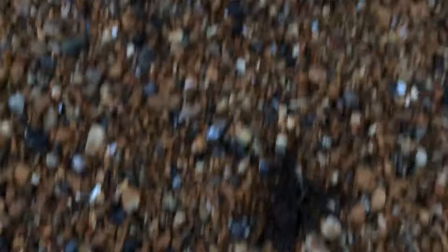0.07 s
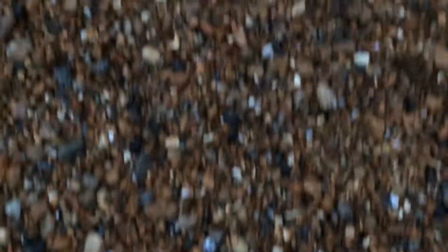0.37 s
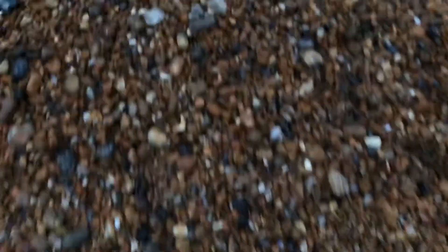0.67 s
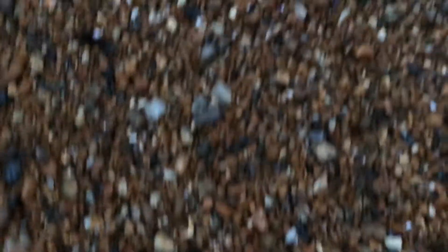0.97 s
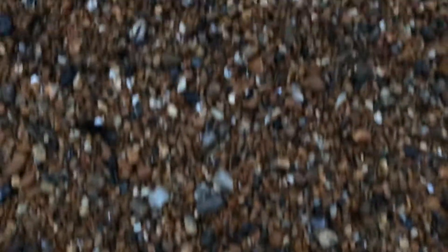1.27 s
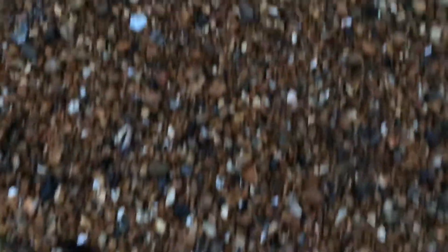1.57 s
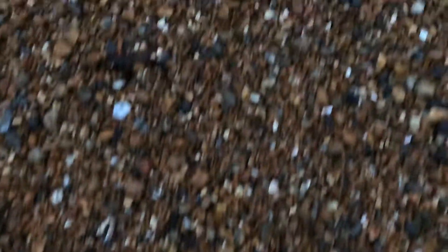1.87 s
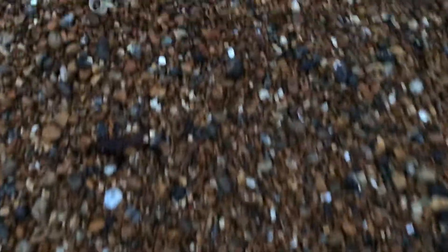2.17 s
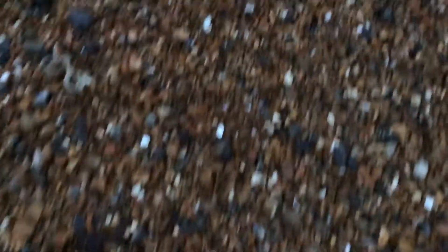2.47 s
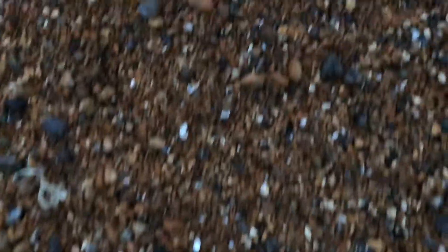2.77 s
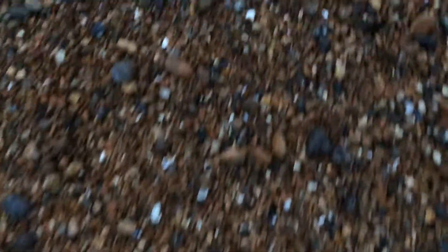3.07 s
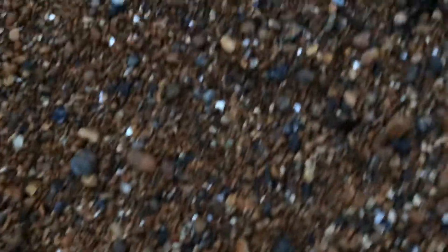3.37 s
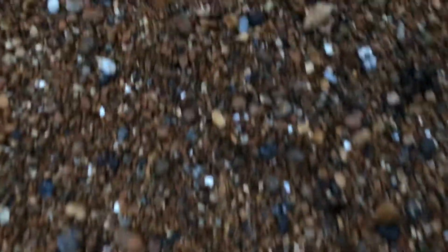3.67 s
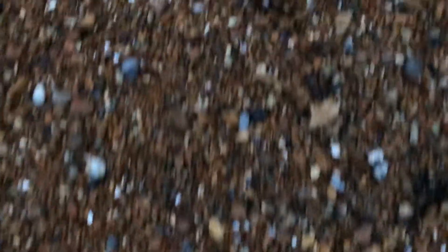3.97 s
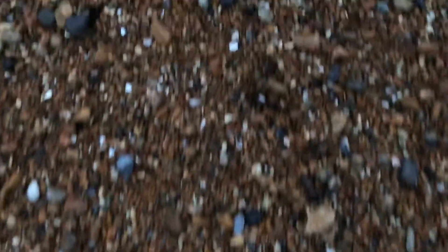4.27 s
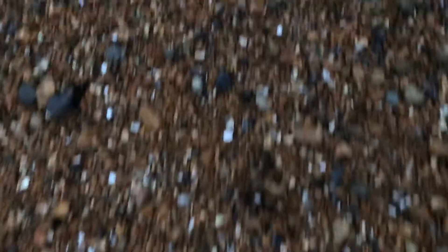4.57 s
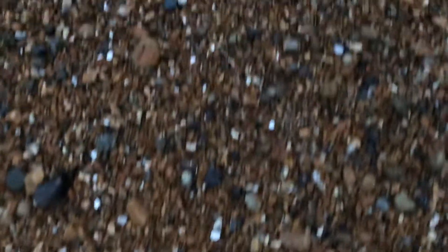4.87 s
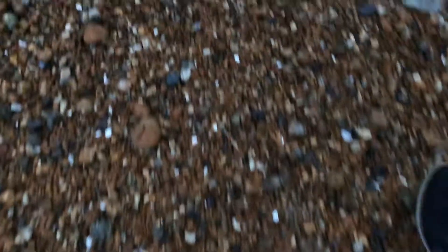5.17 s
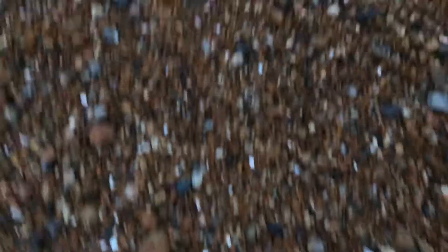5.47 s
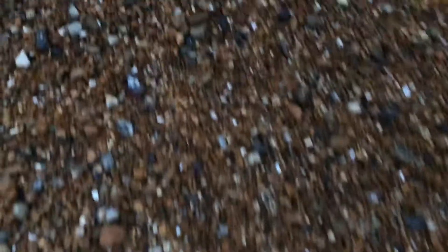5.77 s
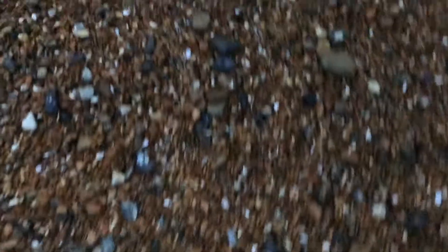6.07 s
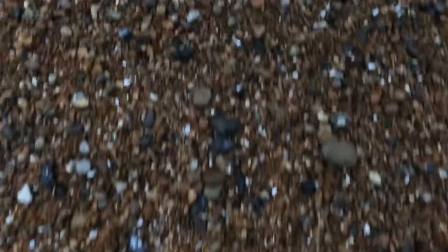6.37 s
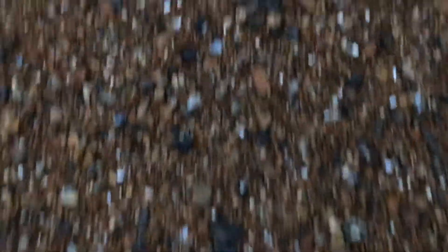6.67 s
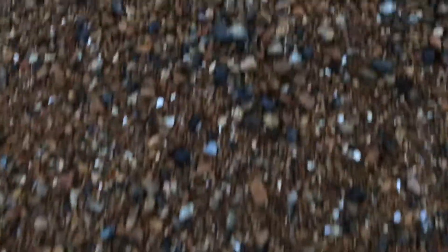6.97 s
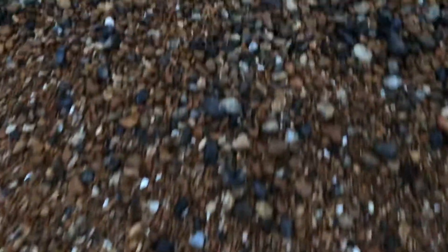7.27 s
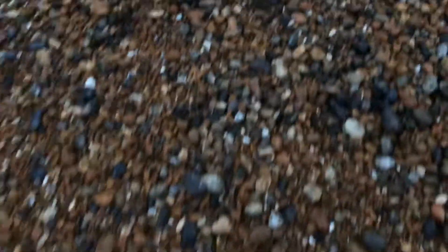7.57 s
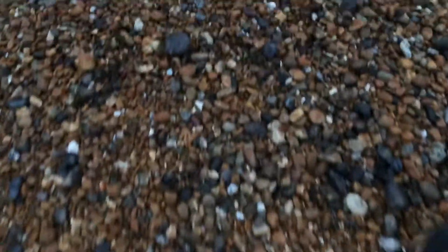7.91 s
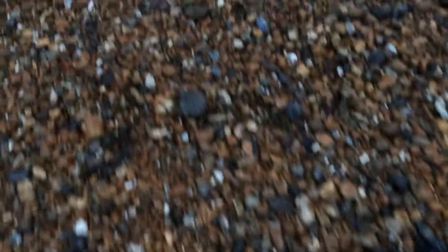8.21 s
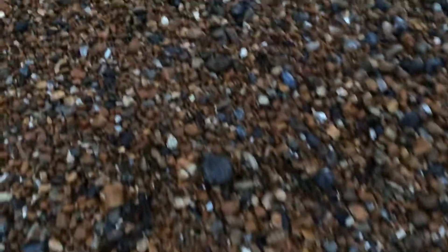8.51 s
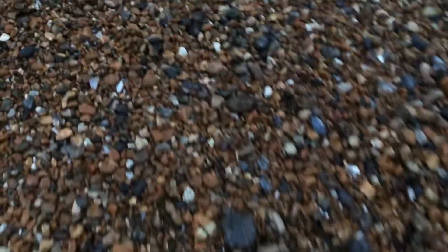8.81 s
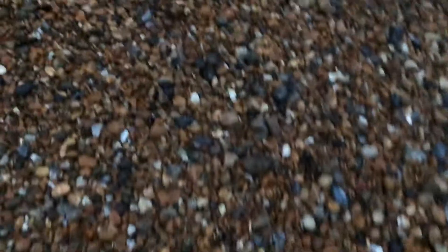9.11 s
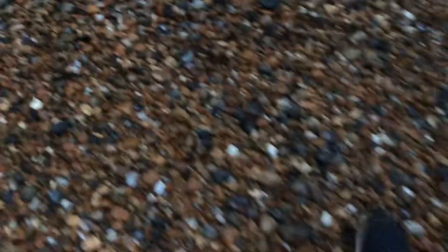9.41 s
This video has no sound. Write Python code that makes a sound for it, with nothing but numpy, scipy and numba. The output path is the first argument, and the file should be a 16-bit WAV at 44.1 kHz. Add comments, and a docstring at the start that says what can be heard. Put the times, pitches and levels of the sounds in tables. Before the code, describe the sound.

Someone walks at a steady pace across a pebble beach, each step a close, bright crunch followed by grinding and small stones pattering back. A long blow of wind rumbles and thumps on the microphone over the first steps, then breaks into separate gusts. Near the end, kicked stones clack together in a cluster before one last heavy step. Faint surf washes in the distance throughout.

```python
"""A steady walk over a shingle beach, the microphone held above the feet, faint surf behind.
The first steps land in a long blow of wind, whose eddies hit the microphone as pressure pulses.
Each heel drives a burst of pebble collisions, the sole grinds on, the toe pushes off, stones settle.
From about 3.5 s the wind breaks into separate gusts; around 8 s kicked stones knock in a cluster.
One last heavy step ends the walk. Throughout, a limiter holds the peaks."""
import sys
import numpy as np
from scipy import signal
from scipy.fft import rfft, irfft
from scipy.io import wavfile
from scipy.ndimage import uniform_filter1d, minimum_filter1d
from numba import njit

SR = 44100
rng = np.random.default_rng(int(sys.argv[2]) if len(sys.argv) > 2 else 0)


def dump(signal):
    """Clip the signal to [-1, 1] and save it as 16-bit WAV at the path in sys.argv[1]."""
    limited = np.clip(np.atleast_2d(signal).T, -1, 1)
    pcm = np.round(limited * 32767).astype(np.int16)
    wavfile.write(sys.argv[1], SR, pcm)


N = 425565
TIME = np.arange(N) / SR
FREQ = np.maximum(np.arange(N // 2 + 1) * SR / N, 1)

# footsteps: t/s, heel level/dB, heel sink/s, heel hold/s, heel treble/dB,
# sole level/dB, sole roll/s, toe level/dB, sole treble/dB
FOOTSTEPS = [(0.0, -14.5, 0.0067, 0.026, -7.0, -30.5, 0.21, -32.5, -13),
             (0.656, -13.5, 0.013, 0.011, -6, -29.5, 0.29, -38.5, -14),
             (1.392, -12.0, 0.014, 0.0088, -5.5, -27.5, 0.26, -33.5, -11.5),
             (2.177, -19.0, 0.019, 0.0038, -6.5, -41.0, 0.27, -27.5, -12),
             (2.939, -17.0, 0.028, 0.018, -5, -31.5, 0.23, -30.5, -10.5),
             (3.681, -21.0, 0.032, 0.013, -5.5, -39.0, 0.28, -31.5, -14),
             (4.425, -16.5, 0.0098, 0.027, -3.5, -26.5, 0.21, -25.5, -9.5),
             (5.157, -19.0, 0.015, 0.063, -6, -26.5, 0.23, -25.0, -10),
             (5.843, -20.0, 0.027, 0.036, -6, -25.5, 0.19, -35.0, -9),
             (6.526, -19.0, 0.011, 0.045, -5, -38.0, 0.23, -25.5, -11.5),
             (6.88, -22.0, 0.011, 0.032, -5, -44.5, 0.162, -41.5, -23),
             (7.224, -22.0, 0.02, 0.058, -5.5, -30.0, 0.24, -29.0, -9.5),
             (7.954, -27.5, 0.016, 0.054, -7.5, -33.0, 0.27, -28.0, -12),
             (8.358, -27, 0.036, 0.029, -4, -35.0, 0.161, -45, -7),
             (8.722, -17, 0.016, 0.039, -5.5, -30.5, 0.23, -42.5, -12),
             (9.519, -14, 0.04, 0.018, -8.5, -19.5, 0.16, -30, -10.5)]
# single stones knocking together: t/s, level/dB, relative body level/dB
STONE_KNOCKS = [(0.295, -17.5, -23), (1.039, -21, -12), (1.154, -29, 3), (1.8028, -22, -23),
                (2.603, -25, -16), (5.0778, -34, -14), (5.669, -20, -27), (5.6804, -20, -26),
                (5.961, -10, -20), (7.2813, -11, -20), (7.5612, -25, -15), (7.677, -18, -20),
                (7.9658, -16, -19), (8.0164, -14, -20), (8.0603, -16, -20), (8.299, -21, -18),
                (8.3674, -18.5, -16), (8.3913, -13.5, -5.5), (8.4013, -14, -20), (8.4144, -10, -22),
                (8.458, -14, -24), (8.8464, -26, -12), (9.0244, -19, -20), (9.1431, -30, 3)]
# tone of the pebbles: f/Hz, level/dB
PEBBLE_EQ = [(500, -16), (1200, -18), (2200, -13), (3200, -8), (4500, -4), (6200, -0.5), (8300, 0.5),
             (10500, -2), (13000, -6.5), (16000, -9)]
# single strong eddies: t/s, level/dB
STRONG_EDDIES = [(0.258, -6), (0.529, -10.5), (0.717, -10), (0.747, -7.5), (0.784, -6), (0.834, -6.5),
                 (0.895, -4), (0.967, -4), (1.009, -8.5), (1.187, -4), (1.308, -11.5), (1.552, -11),
                 (1.704, -4), (2.44, 0), (2.464, 0), (2.65, -5), (3.036, -10), (3.361, -11), (3.467, -9.5),
                 (3.6, -13.5), (4.028, -16), (4.053, -8.5), (4.153, -17), (4.37, -11), (4.497, -4.5),
                 (5.715, -17.5), (5.751, -15.5), (7.684, -11), (8.441, -8.5), (9.135, -17.5), (9.46, -20.5)]


def undb(db):
    """Decibels to gain."""
    return 10 ** (np.asarray(db) / 20)


def unit(x):
    """Scale to rms 1."""
    return x / np.sqrt(np.mean(x ** 2))


def curves(table):
    """Automation: join timed rows by straight lines, one curve for each column."""
    times, *columns = np.transpose(table)
    return [np.interp(TIME, times, column) for column in columns]


def colour(x, points):
    """EQ a sound through points of f/Hz, level/dB."""
    hz, db = np.transpose(points)
    return irfft(rfft(x) * undb(np.interp(np.log(FREQ), np.log(hz), db)), N)


def band(x, lo_hz, hi_hz, order=8):
    """Band-pass with smooth skirts and no delay."""
    return irfft(rfft(x) / np.sqrt((1 + (lo_hz / FREQ) ** order) * (1 + (FREQ / hi_hz) ** order)), N)


def wobble(rate_hz):
    """Smooth random modulation, rms 1."""
    knots = rng.standard_normal(N // 10)
    joined = np.interp(TIME * rate_hz, np.arange(len(knots)), knots)
    return unit(uniform_filter1d(joined, int(SR / rate_hz / 2) + 1))


def even(x, span_s):
    """Ride the rms to about 1 over a span, keeping the faster detail."""
    size = int(span_s * SR)
    return x / np.sqrt(np.abs(uniform_filter1d(uniform_filter1d(x ** 2, size), size)) + 1e-12)


def swell(start, rise_s, length_s, fall_db_per_s):
    """Envelope that rises, holds until its length is over, then dies away."""
    age = TIME - start
    return np.clip(age / rise_s, 0, 1) * undb(-fall_db_per_s * np.clip(age - length_s, 0, 1))


def lull(times, depth_db, width_s):
    """Gain that dips smoothly around given moments."""
    marks = np.zeros(N)
    marks[(np.asarray(times) * SR).astype(int)] = 1
    dips = signal.fftconvolve(marks, np.hanning(int(width_s * SR)), "same")
    return undb(-depth_db * np.clip(dips, 0, 1))


def random_times(per_second):
    """Independent triggers at a steady or changing average rate."""
    return TIME[rng.random(N) < per_second / SR]


def accents(count, cap):
    """Random strengths: many weak, a few strong."""
    return np.minimum(rng.exponential(size=count), cap)


def surf():
    """A smooth, distant wash of waves on the shingle."""
    surf_fader = [(0, -40), (4.3, -42), (5.7, -37), (7.1, -38.5), (9.65, -35)]  # rise and fall of the surf: t/s, level/dB
    wash_eq = [(60, 1), (250, -13.5), (500, 2.5), (1200, 1), (2200, -5.5), (4000, -10), (8000, -21.5),
               (12000, -33), (16000, -37)]  # tone of the waves: f/Hz, level/dB
    level_db, = curves(surf_fader)
    wash = unit(colour(rng.standard_normal(N), wash_eq))
    flicker_db = .6 * wobble(9)
    return wash * undb(level_db + flicker_db)


def airflow(tear_db=-9, tear_at_db=-14.5, tear_growth=0.98, rumble_share=0.2):
    """Blow, gusts and breeze add in power: levels of rumble, flapping and tearing edge, in dB."""
    blow = [(0.0, -18, -22.5), (0.052, -12.5, -13.5), (0.206, -11, -12.5), (0.458, -19.5, -20),
            (0.567, -16.5, -16.5), (0.643, -21, -25.5), (0.744, -19.0, -15), (1.001, -14.5, -14),
            (1.208, -14, -13), (1.27, -24.0, -25.5), (1.337, -18, -13.5), (1.422, -29.5, -24.5),
            (1.567, -23.0, -19), (1.699, -12.5, -13), (2.036, -8, -14), (2.11, -23.5, -24.5),
            (2.227, -15, -11.5), (2.502, -12, -15), (2.715, -16.5, -15.5), (2.96, -23, -20),
            (3.173, -9.5, -17.0), (3.415, -19.0, -18.5)]  # the long opening blow: t/s, rumble/dB, flapping/dB
    breeze = [(3.498, -26.5, -30), (4.317, -23.5, -27.5), (4.845, -30, -31.5), (6.497, -31, -34.5),
              (8.587, -27.5, -33), (9.65, -34, -38.5)]  # a light, slowly dropping breeze: t/s, rumble/dB, flapping/dB
    gusts = [(3.45, 0.071, -14, -19), (3.583, 0.025, -14.5, -13.5), (3.67, 0.098, -19.5, -26),
             (4.006, 0.1, -12.5, -23), (4.115, 0.057, -19.0, -26), (4.356, 0.077, -13, -14),
             (4.465, 0.16, -13, -20), (4.659, 0.11, -26, -25), (4.929, 0.18, -23, -22.5),
             (5.137, 0.16, -33, -23), (5.441, 0.1, -25, -22.5), (5.613, 0.031, -23, -22.5),
             (5.719, 0.041, -28, -33), (5.91, 0.028, -26.0, -27), (6.12, 0.023, -17, -22),
             (6.173, 0.19, -27, -30), (6.542, 0.1, -30.0, -28.5), (6.768, 0.057, -38, -23.5),
             (6.987, 0.272, -26, -24.0), (7.317, 0.079, -23.5, -26.0), (7.449, 0.082, -16.5, -18),
             (7.577, 0.05, -17, -21.5), (7.664, 0.14, -21, -11.5), (7.794, 0.12, -18.5, -16.5),
             (7.968, 0.102, -24, -23.5), (8.102, 0.13, -33, -23), (8.29, 0.053, -28, -20.5),
             (8.406, 0.045, -27, -15.5), (8.535, 0.033, -23, -18), (8.908, 0.066, -29, -39.5),
             (9.041, 0.1, -28, -26.5)]  # separate gusts: t/s, length/s, rumble/dB, flapping/dB
    dying_db = 250 * np.clip(TIME - blow[-1][0], 0, 1)
    power = undb(np.array(curves(blow)) - dying_db) ** 2 + undb(curves(breeze)) ** 2
    for t, length_s, *levels_db in gusts:
        envelope = swell(t, rise_s=0.018, length_s=length_s, fall_db_per_s=300)
        power += (undb(levels_db)[:, None] * envelope) ** 2
    rumble_db, flap_db = 10 * np.log10(power)
    # the stream tears more, the harder it blows
    force_db = flap_db + rumble_share * np.maximum(rumble_db - flap_db, -3)
    edge_db = force_db + tear_db + tear_growth * (force_db - tear_at_db)
    return rumble_db, flap_db, edge_db


def sweep(x, cycles, knee_hz):
    """An eddy's sharp front comes first and its broad body later: a short falling flap."""
    return irfft(rfft(x) * np.exp(-2j * np.pi * cycles * np.log(FREQ + knee_hz)), N)


def wind(rumble_db, flap_db, edge_db, per_second=850, flutter_db=1.47, crackle_db=2.5):
    """Eddies hit the microphone as bunched pressure pulses; the strongest have the sharpest edges."""
    wind_eq = [(20, -37), (35, -24), (62, -2.5), (130, 2), (250, 1.5), (370, -0.5), (470, 0.5), (600, -3),
               (750, -6.5), (1100, -12.5), (1600, -22), (2300, -34), (3500, -46), (6000, -68)]  # tone of the eddies: f/Hz, level/dB
    boom_fader = [(0, -9.5), (1.4, -11.5), (2.0, -3.5), (2.7, -2.5), (5, -7.5), (6.2, -8), (8, -8),
                  (8.8, 0), (9.65, -0.5)]  # the largest, slowest eddies: t/s, level against the rumble/dB
    hits = (rng.random(N) < per_second / SR) * rng.choice([-1, 1], N)
    strength = accents(N, cap=3.5) + 0.98 * wobble(60)

    def eddies(lo_hz, hi_hz, spread_db, span_s):
        """The pulses in one range of eddy sizes, with some bunching of its own."""
        pulses = hits * undb(spread_db * (strength + .5 * wobble(45)))
        flaps = sweep(pulses, cycles=1.6, knee_hz=142)
        return even(band(colour(flaps, wind_eq), lo_hz, hi_hz), span_s)

    boom_db, = curves(boom_fader)
    boom = eddies(lo_hz=18, hi_hz=83, spread_db=3, span_s=0.099) * undb(rumble_db + boom_db - 1.1)
    rumble = eddies(lo_hz=117, hi_hz=228, spread_db=2.5, span_s=0.089) * undb(rumble_db - 1.73)
    flap = eddies(lo_hz=278, hi_hz=748, spread_db=3, span_s=0.046) * undb(flap_db - 0.56)
    edge = eddies(lo_hz=903, hi_hz=5014, spread_db=5, span_s=0.057) * undb(edge_db - 2.5)
    # the stream flutters in puffs, and goes slack just before a strong eddy arrives
    slack = lull(np.transpose(STRONG_EDDIES)[0] - .007, depth_db=7, width_s=0.021)
    puffs = undb(flutter_db * wobble(40)) * slack
    crackle = edge * undb(crackle_db * wobble(30))
    return boom + rumble + (flap + crackle) * puffs


def buffets(delay_s=0.00034, narrowest_s=0.00044, gain_db=7, body_db=-5, body_stretch=2.26):
    """A strong eddy swings the pressure once: a narrow popping core inside a broad, round body."""
    swings = np.zeros(N)
    for (t, level_db), turn in zip(STRONG_EDDIES, rng.random(len(STRONG_EDDIES))):
        width_s = narrowest_s * undb(-0.26 * level_db)  # weaker eddies are broader
        near = slice(int((t - .02) * SR), int((t + .02) * SR))
        passing = (TIME[near] - t - delay_s) / width_s
        core = (1 + 1j * passing) ** -3
        body = (1 + 1j * passing / body_stretch) ** -3
        swing = np.exp(2j * np.pi * turn) * (core + undb(body_db) * body)
        swings[near] += undb(level_db + gain_db) * swing.real
    return sweep(swings, cycles=2.1, knee_hz=94)


@njit
def ring(start, hz, t60, size):
    """Struck stones ring as a sum of damped sines."""
    out = np.zeros(N)
    for k in range(len(start)):
        pole = np.exp((2j * np.pi * hz[k] - np.log(1000) / t60[k]) / SR)
        z, first = size[k] + 0j, int(start[k] * SR)
        for i in range(max(first, 0), min(first + int(t60[k] * SR), N)):
            z *= pole
            out[i] += z.imag
    return out


def collisions(start, size, t60_s, scatter, modes=3):
    """Each collision rings a few random pitches very briefly; some ring longer than others."""
    shape = (len(start), modes)
    hz = rng.uniform(400, 17000, shape)
    t60 = t60_s * np.exp(scatter * np.minimum(rng.standard_normal(shape), 1))
    gain = np.reshape(size, (-1, 1)) * rng.choice([-1, 1], shape) * np.sqrt(t60_s / t60)
    return ring(np.repeat(start, modes), hz.ravel(), t60.ravel(), gain.ravel())


def strays(base_per_second=110, landing_s=.12, scatter_s=.15, gain_db=-46, spread_db=3):
    """Each toe flicks up small stones that patter back; a heavier sole stirs up more of them."""
    per_second = 0
    for t, _, _, _, _, sole_db, roll_s, *_ in FOOTSTEPS:
        shower = np.exp(-((TIME - t - roll_s - landing_s) / scatter_s) ** 2)
        per_second += base_per_second * undb(0.99 * (sole_db + 29.5)) * shower
    start = random_times(per_second)
    size = undb(gain_db + spread_db * accents(len(start), cap=3))
    ticks = colour(collisions(start, size, t60_s=0.003, scatter=.7, modes=12), PEBBLE_EQ)
    return ticks + band(ticks, lo_hz=10500, hi_hz=15000)


def knocks(rattle_s=0.0036, fade_db=7, gain_db=-3, contacts=9, body_hz=3300, body_t60_s=0.017):
    """A kicked stone strikes and rattles against its neighbours; a large one also rings lower."""
    t, level_db, body_db = np.transpose(STONE_KNOCKS)
    lag = rng.exponential(size=(len(t), contacts)) * (np.arange(contacts) > 1)
    size = undb(level_db[:, None] + gain_db - fade_db * lag)
    start = (t[:, None] + rattle_s * lag).ravel()
    rattle = colour(collisions(start, size.ravel(), t60_s=0.0027, scatter=0.73, modes=5), PEBBLE_EQ)
    hz = body_hz * np.exp(0.39 * rng.standard_normal(len(start)))
    body_size = size * undb(body_db[:, None] - 3)
    return rattle + ring(start, hz, np.full(len(start), body_t60_s), body_size.ravel())


def snaps(load_db, per_second=110, gain_db=-4, muffle=.3):
    """Wedged pebbles snap free under load: sharp clicks on top of the grinding."""
    clicks = collisions(random_times(per_second), undb(gain_db), t60_s=0.002, scatter=.5, modes=10)
    return colour(clicks, PEBBLE_EQ) * undb(load_db - muffle * np.maximum(load_db + 21, 0))


def giving_way(shift_db=0.87, slip_db=1.01):
    """The shingle yields unevenly under the foot, in slow shifts and quick slips, in dB."""
    return shift_db * wobble(30) + slip_db * wobble(85)


def footwork(lead_s=.06, sole_lands_s=.047, toe_push_s=.055):
    """Heel strikes, sole rolls, toe pushes off, the other foot drags: load and treble, in dB."""
    # the feet drag and scatter stones between steps: t/s, length/s, level/dB, treble/dB
    scuffs = [(0.159, 0.032, -29.5, -5), (0.265, 0.14, -35.5, -11), (0.553, 0.1, -42.0, -8),
              (1.294, 0.06, -30.0, -11.5), (1.702, 0.121, -43.0, -6), (2.024, 0.16, -35.5, -10.5),
              (2.267, 0.068, -29.0, -11), (2.47, 0.099, -39.5, -3), (2.59, 0.11, -44.5, -7),
              (2.773, 0.05, -41.0, -11), (2.889, 0.046, -29.5, -5.5), (3.225, 0.037, -43.0, -3.5),
              (3.639, 0.041, -38.5, -9), (3.797, 0.055, -33.5, -11), (4.336, 0.099, -38.0, -14),
              (4.719, 0.15, -47.0, -6), (5.065, 0.035, -42.5, -13), (5.476, 0.061, -39.5, -9),
              (5.625, 0.121, -35.5, -8), (5.778, 0.066, -36.0, -18), (6.15, 0.067, -35.0, -5),
              (6.209, 0.064, -29.5, -7), (6.321, 0.21, -39.5, -12), (6.656, 0.051, -35.5, -14),
              (7.079, 0.037, -40.5, -11), (7.159, 0.0096, -36.5, -13), (7.536, 0.079, -45.0, -9),
              (7.654, 0.33, -35.0, -9.5), (8.021, 0.03, -29.5, -4), (8.274, 0.014, -34.5, -7.5),
              (8.542, 0.19, -31.0, -11.5), (8.987, 0.12, -38.5, -10.5), (9.161, 0.16, -45.5, -13),
              (9.322, 0.11, -25.5, -9.5), (9.422, 0.103, -30.5, -15)]
    contacts = []  # level/dB, treble/dB, t/s, rise/s, length/s, fall/(dB/s)
    for t, length_s, level_db, treble_db in scuffs:
        # a few stones shift softly just before each drag takes hold
        lead_in = (level_db - 13, treble_db, t - lead_s, lead_s, lead_s, 175)
        drag = (level_db, treble_db, t, .031, length_s, 175)
        contacts += [lead_in, drag]
    for t, heel_db, sink_s, hold_s, heel_treble_db, sole_db, roll_s, toe_db, sole_treble_db in FOOTSTEPS:
        heel = (heel_db, heel_treble_db, t, sink_s, sink_s + hold_s, 250)
        sole = (sole_db, sole_treble_db, t + sole_lands_s, .061, roll_s - sole_lands_s, 170)
        toe = (toe_db, sole_treble_db + 4, t + roll_s - toe_push_s, toe_push_s, toe_push_s, 300)
        contacts += [heel, sole, toe]
    power, weighted_treble = 0, 0
    for level_db, treble_db, *envelope in contacts:
        part = (undb(level_db) * swell(*envelope)) ** 2 + 1e-12
        power += part
        weighted_treble += treble_db * part
    return 10 * np.log10(power) + giving_way(), weighted_treble / power


def shifting_stones(load_db, base_per_second=11000, spread_db=0.2, slip_db=1.76, muffle=0.3):
    """More load, more collisions of small pebbles, with the odd clack of a larger stone; rms near 1."""
    start = random_times(base_per_second * undb(.4 * (load_db + 25)))
    size = undb(spread_db * accents(len(start), cap=5))
    grit = collisions(start, size, t60_s=0.0041, scatter=1) * undb(slip_db * wobble(70))
    clacks = collisions(random_times(per_second=50), undb(-1), t60_s=0.022, scatter=1, modes=6)
    # large stones are muffled under the sole and stand out between steps
    clacks *= undb(-muffle * (load_db + 33))
    return even(colour(grit + clacks, PEBBLE_EQ), span_s=0.057)


def crunch(load_db, treble_db, neutral_treble_db=-6.5, settling_db=-55, gain_db=0.39):
    """The shoe presses in: hard, fast contacts are bright and thin, slow grinding is dull and coarse."""
    stones = shifting_stones(load_db)
    coarse = band(stones, lo_hz=100, hi_hz=3960)
    dull = band(stones, lo_hz=100, hi_hz=7400)
    hardness_db = np.clip(treble_db - neutral_treble_db, -6, 3.5)
    sparkle = undb(1.2 * hardness_db) * (stones - dull)
    weight = (undb(-.9 * hardness_db) - 1) * coarse
    # between steps a few stones keep settling
    loudness = np.hypot(undb(load_db + gain_db), undb(settling_db))
    # the small stones ease off while a large one gives way
    duck = lull(np.transpose(STONE_KNOCKS)[0], depth_db=2, width_s=0.091)
    return even(dull + sparkle + weight, span_s=0.011) * loudness * duck


def scene():
    """Feet, wind and sea in the open air, in mono."""
    load_db, treble_db = footwork()
    feet = crunch(load_db, treble_db) + snaps(load_db) + knocks() + strays()
    return (feet + wind(*airflow()) + buffets() + surf())[None]


def record(dry, ceiling=0.79, hold_s=0.0028, top_hz=15900):
    """A fast limiter ducks everything under the strongest eddies; a steep low-pass cuts the top."""
    size = int(hold_s * SR)
    allowed_gain = np.minimum(1, ceiling / (np.abs(dry) + 1e-9))
    gain = uniform_filter1d(minimum_filter1d(allowed_gain, size), size)
    low_pass = signal.ellip(12, .1, 80, top_hz, fs=SR, output="sos")
    return signal.sosfilt(low_pass, dry * gain)


dry = scene()
out = record(dry)
dump(out)
```